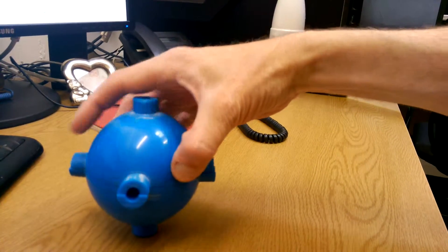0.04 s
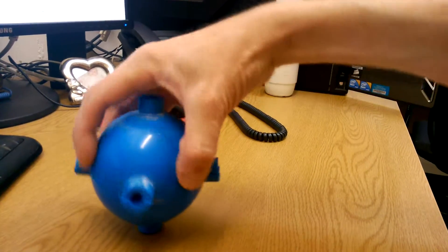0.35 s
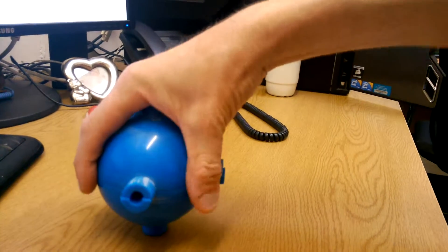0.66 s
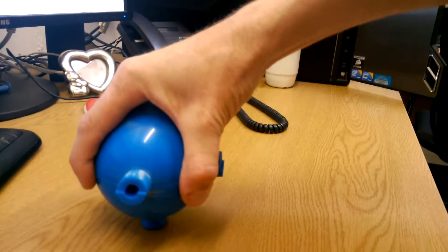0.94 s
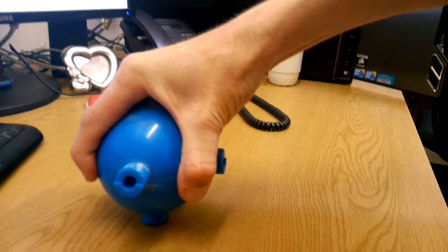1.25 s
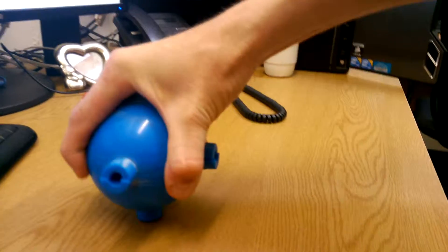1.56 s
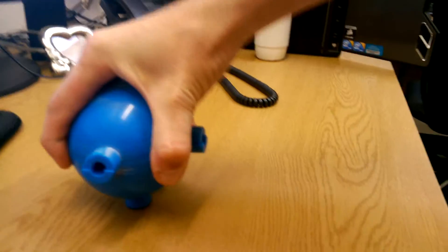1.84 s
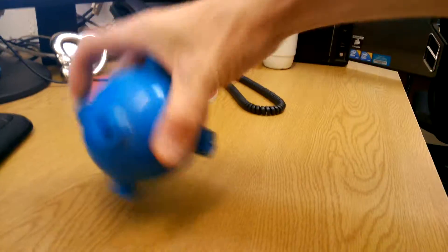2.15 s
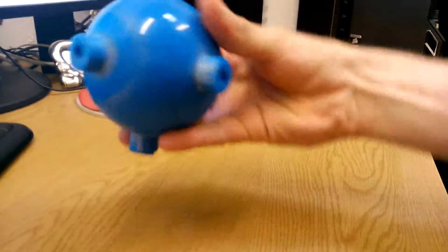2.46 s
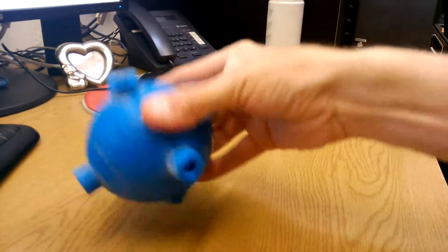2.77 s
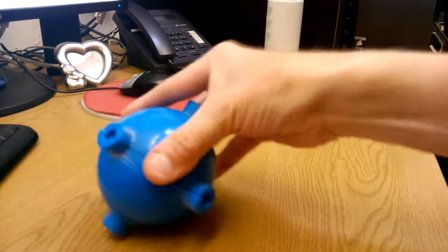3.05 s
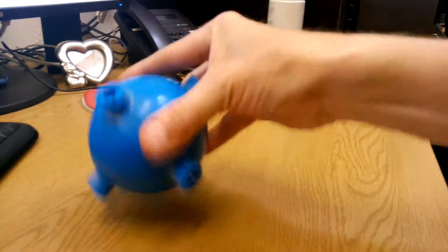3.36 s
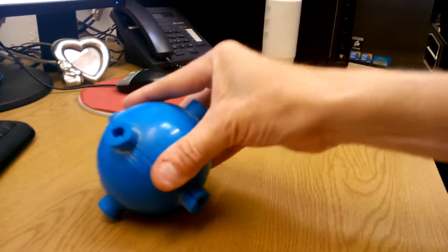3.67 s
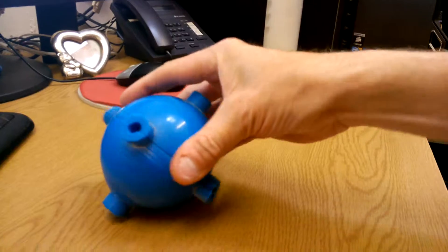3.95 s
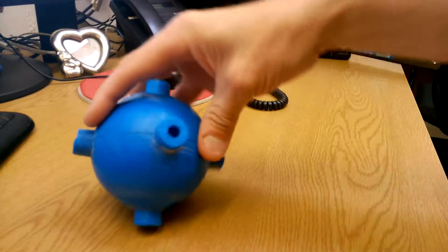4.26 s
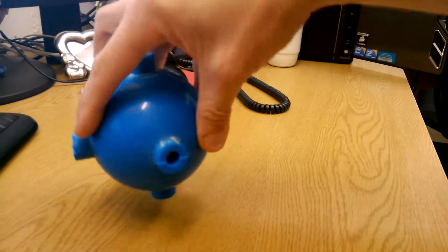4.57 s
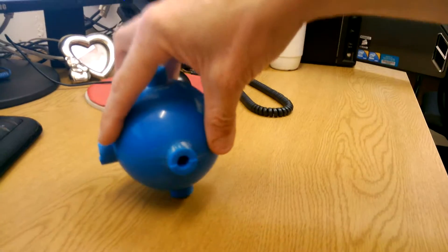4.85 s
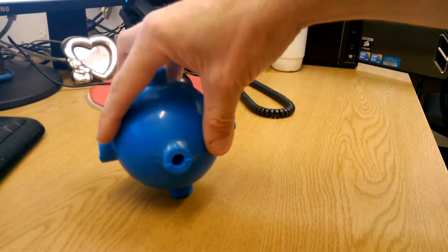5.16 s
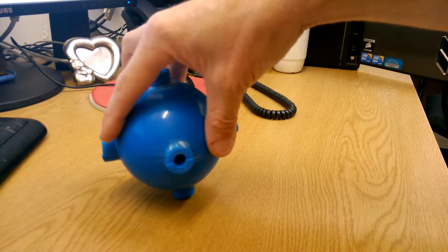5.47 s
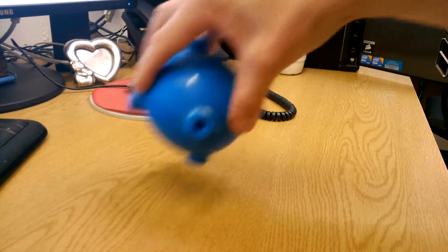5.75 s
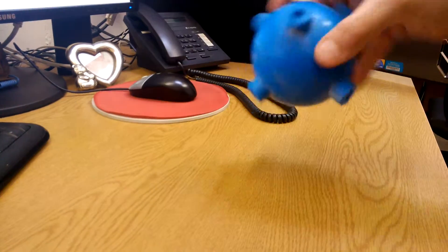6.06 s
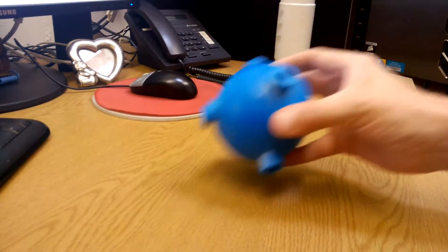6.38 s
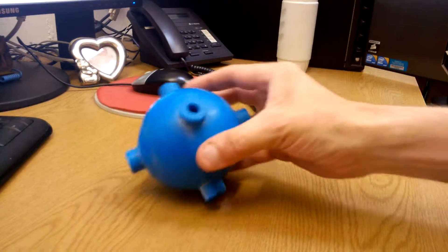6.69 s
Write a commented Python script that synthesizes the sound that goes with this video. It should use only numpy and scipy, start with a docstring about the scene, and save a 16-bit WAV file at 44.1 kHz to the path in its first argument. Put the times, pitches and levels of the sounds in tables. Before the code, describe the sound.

A hollow plastic ball with stubby pegs ticks and taps lightly on a wooden office desk while fingers rub its shell. It then knocks down six times in quick succession, growing louder, each hit booming in the desk and ringing briefly, the hardest overloading the close microphone. Soft settling taps follow, then a single knock and, near the end, two more with small skids. Ventilation hums low throughout.

```python
"""A hollow plastic ball with stubby pegs is turned by hand on an office desk, then bounced harder
and harder. Each knock booms in the desk and rings briefly in the shell; the loud ones overload
the close microphone, whose gain ducks and creeps back. In between, pegs tick and skid on the wood
and fingers slip on the plastic, over a low ventilation hum."""
import sys
import numpy as np
from scipy import signal
from scipy.fft import rfft, irfft
from scipy.io import wavfile
from scipy.ndimage import uniform_filter1d

SR = 44100
rng = np.random.default_rng(int(sys.argv[2]) if len(sys.argv) > 2 else 0)


def materialize(psi):
    """Save the field psi as 16-bit PCM at rate SR to the path in sys.argv[1].

    A 1-D psi becomes a single channel; in a 2-D psi each row is a channel.
    """
    bounded = np.clip(np.atleast_2d(psi).T, -1, 1)
    quanta = np.round(bounded * 32767).astype(np.int16)
    wavfile.write(sys.argv[1], SR, quanta)


N = 296352
TIME_S = np.arange(N) / SR
RING_S = np.arange(SR) / SR   # time since a contact

# ventilation rumble: freq_hz, relative_db
VENT_SPECTRUM = [(20, 6.5), (55, -8), (80, -2.5), (100, -0.5), (140, -7), (190, -0.5), (255, -4.5),
                 (320, -8), (500, -10), (800, -16.5), (1500, -25.5), (2400, -29.5), (4000, -45)]
# fan tones: pitch_hz, rms_db
FAN_TONES = [(100, -47), (183, -47.5), (259, -51.5)]
# steady hiss: freq_hz, relative_db
HISS_SPECTRUM = [(20, 31), (50, 23.5), (150, -4), (1000, 13), (2300, 5), (3300, 2.5), (4600, 4),
                 (5200, -0.5), (5550, 8.5), (6000, 1.5), (7000, -1.5), (8500, -0.5), (9700, 7), (11000, -4),
                 (13000, -4.5), (16000, -12)]
# office reverberation: freq_hz, t60_s
OFFICE_DECAY = [(100, 0.54), (250, 0.54), (800, 0.52), (2000, 0.5), (5000, 0.39), (12000, 0.32)]

# short finger slips: centre_s, half_length_s, level_db
FINGER_SLIPS = [(1.483, 0.038, -43), (1.591, 0.016, -37), (1.614, .009, -46), (5.485, 0.02, -46.5)]
# finger slip, also the echo of a peg tick: freq_hz, relative_db
SLIP_SPECTRUM = [(2000, -23), (4000, -9.5), (7000, -11), (8500, 0), (9900, 9), (11000, -7), (13000, -11),
                 (16000, -21)]
# finger slides, the rows at 3.92 s and 4.52 s faint breaths: centre_s, half_length_s, level_db, squeak_hz (a
# thin whistle for a breath), squeak_relative_db
SLIDES_AND_BREATHS = [(0.061, 0.026, -58, 7280, 4), (0.17, 0.088, -54.5, 7280, -10), (0.9, 1, -58.5, 7500, -22),
                      (1.65, 0.062, -72.5, 6730, 20), (1.904, 0.28, -49, 6410, -13),
                      (3.923, 0.092, -64.5, 5500, -1), (4.518, 0.17, -60, 4700, -9)]
# hiss of the finger slides and breaths: freq_hz, relative_db
SWELL_SPECTRUM = [(2500, -6), (3600, -11), (4300, -0.5), (5400, -1.5), (6200, -8.5), (8500, -6.5),
                  (9800, 1.5), (11000, -9.5), (13000, -20), (16000, -24)]

# a peg skids over the wood: centre_s, half_length_s, level_db
PEG_SKIDS = [(5.95, 0.015, -48), (6.031, 0.021, -58), (6.092, 0.016, -56.5)]
# resonances of the skidding peg: freq_hz, width_hz, level_db
PEG_SKID_MODES = [(263, 19, 27), (630, 130, -18), (3330, 38, -2), (4080, 590, -16), (6100, 150, -3),
                  (6660, 330, 0.5), (8400, 460, 2.5), (9660, 190, -3)]
# pegs tick on the wood: start_s, level_db
PEG_TICKS = [(0.3494, -25.5), (0.4013, -18), (0.5, -17), (0.5781, -31), (0.7721, -22), (0.7746, -17.5),
             (1.269, -18), (1.347, -32), (1.587, -36), (6.553, -37.5)]
# ring of a tick: freq_hz, level_db, t60_s
PEG_TICK_MODES = [(665, -14.5, 0.032), (1310, -15, 0.0066), (2800, -10.5, 0.0042), (5430, -5, 0.0019),
                  (7400, -10, 0.003), (8600, -7, 0.0059), (9600, -4, 0.0084), (12000, -7, 0.0017)]

# desk top: freq_hz, level_db, t60_s
DESK_TOP_MODES = [(97, -25, 0.28), (114.7, -28.5, 0.64), (141.5, -13, .24), (164.8, -30, 0.74),
                  (182.7, -21, 0.24), (208.7, -8.5, 0.18), (217, -16, 0.54), (250, -21.5, 0.15),
                  (285.5, -18.5, 0.33)]
# hollow shell: freq_hz, level_db, t60_s
SHELL_MODES = [(298.2, -15, 0.13), (333, -3.5, 0.053), (349.7, -8, 0.1), (393, -30, 0.16),
               (430, -22.5, 0.16), (497, -33, 0.51), (525.2, -21.5, 0.22), (574, -16.5, 0.13),
               (590, -41, 0.079), (616.5, -11, 0.052), (729, -32, 0.16), (734.5, -1, 0.023),
               (785.3, -15.5, 0.1), (898, -24.5, 0.13), (1004, -18.5, 0.064), (1135, -30, 0.15),
               (1237, -38, 0.27), (1505, -37, 0.097), (1647, -26.5, 0.071), (2150, -32, 0.021),
               (2380, -30, 0.047), (3930, -52, 0.59)]
# the spot under a peg gives way and springs back: freq_hz, level_db, t60_s
PEG_SEAT_MODES = [(352.5, -10, 0.027), (590, 0, 0.016), (1360, -20.5, 0.04), (2510, -11, 0.017)]
# crowded, quickly damped modes of a knock: freq_hz, relative_db
CLACK_SPECTRUM = [(30, 17.5), (100, -32), (250, -11), (450, 10), (750, 4.5), (900, -21.5), (1800, 0.5),
                  (3000, -13), (6000, -32), (16000, -48)]
# room echo of a knock: freq_hz, relative_db
KNOCK_ECHO_SPECTRUM = [(60, -30), (130, -5.5), (250, 10), (550, 3.5), (1000, -3.5), (2000, -14),
                       (4000, -18.5), (8000, -1.5), (16000, -27)]
# crack of a hard contact: freq_hz, relative_db
CRACK_SPECTRUM = [(300, 27), (1200, 11), (2500, 1.5), (4200, 11), (6000, 3), (7800, 3.5), (9700, 12),
                  (11500, 1), (16000, -10)]
# room echo of the crack: freq_hz, relative_db
CRACK_ECHO_SPECTRUM = [(300, 3), (1200, 11.5), (2300, 2), (3100, -0.5), (4200, -2.5), (6000, -6.5),
                       (7800, -11), (9700, 1), (11500, -14), (16000, -32)]
# the held ball rocks and settles on the desk: start_s, strength_db, bright_hz
BALL_NUDGES = [(0.2527, -26, 990), (0.3069, -24, 990), (0.351, -23.5, 920), (0.4013, -18, 980),
               (0.5015, -19, 940), (0.7753, -17.5, 1250), (1.368, -26, 2800), (1.381, -25, 420),
               (3.336, -18, 402), (3.398, -12.5, 720), (3.501, -17.5, 560), (3.524, -16.5, 298),
               (3.626, -19, 300), (3.66, -16, 466), (4.896, -26.5, 395), (6.547, -21, 616),
               (6.5552, -16.5, 735), (6.578, -12.5, 294)]
# bounces: start_s, strength_db, hardness_octaves, second_peg_delay_s, second_peg_relative_db
BALL_BOUNCES = [(2.019, 4, -0.17, 0.013, -16.5), (2.2458, 10, 0.41, 0.0085, -9),
                (2.4004, 6, 0.19, 0.021, -11.5), (2.589, 16, 0.064, 0.016, -11),
                (2.7991, 19.5, 0.23, 0.0061, -27), (3.0075, 20, 0.4, 0.0065, -22.5),
                (4.214, 5.5, -0.21, 0.006, -29), (5.9338, -1.5, 0.14, 0.019, -14.5),
                (6.1068, 2, 0.33, 0.016, -14)]


def from_db(db):
    """Decibels to gain."""
    return 10 ** (np.asarray(db) / 20)


def at_hz(points, hz):
    """Read a table on a log-frequency axis."""
    freqs, values = np.transpose(points)
    return np.interp(np.log(np.maximum(hz, 1)), np.log(freqs), values)


def noise(spectrum, size):
    """Coloured noise, rms 1."""
    gain = from_db(at_hz(spectrum, np.fft.rfftfreq(size, 1 / SR)))
    x = irfft(rfft(rng.standard_normal(size)) * gain, size)
    return x / np.std(x)


def decay(t60_s):
    """Envelope that loses 60 dB in t60_s."""
    return np.exp(-np.log(1000) * RING_S / t60_s)


def swells(events):
    """Sum of Gaussian envelopes."""
    return sum(from_db(db) * np.exp(-((TIME_S - centre_s) / half_s) ** 2)
               for centre_s, half_s, db in events)


def add(track, start_s, sound):
    """Mix a sound into the track."""
    start = round(start_s * SR)
    track[start:start + len(sound)] += sound[:N - start]


def resonance(x, hz, width_hz):
    """One resonance excited by x, rms 1."""
    y = signal.lfilter(*signal.iirpeak(hz, hz / width_hz, fs=SR), x)
    return y / np.std(y)


def lowpass(x, top_hz, order):
    """Butterworth low-pass, corner capped at SR / 3."""
    return signal.sosfilt(signal.butter(order, min(top_hz, SR / 3), fs=SR, output="sos"), x)


def power(x, window_s=0.0035):
    """Running mean square."""
    return np.maximum(uniform_filter1d(x ** 2, round(window_s * SR)), 1e-12)


def struck(modes, alternate, spread_db):
    """Damped modes, in step or alternating in sign; their levels vary with the spot struck."""
    spot_db = rng.normal(0, 1, len(modes)) * spread_db
    sign = -1 if alternate else 1
    return sum(sign ** k * from_db(db + spot_db[k]) * np.cos(2 * np.pi * hz * RING_S) * decay(t60_s)
               for k, (hz, db, t60_s) in enumerate(modes))


def ventilation():
    """Steady air rumble, fan tones and hiss."""
    rumble = from_db(-37.5) * noise(VENT_SPECTRUM, N)
    hum = sum(from_db(db) * np.sqrt(2) * np.sin(2 * np.pi * (hz * TIME_S + rng.random()))
              for hz, db in FAN_TONES)
    hiss = from_db(-54) * noise(HISS_SPECTRUM, N)
    return rumble + hum + hiss


def office_tail(spectrum, build_s):
    """Diffuse reflections build up, then die octave by octave, treble first."""
    bins = rfft(noise(spectrum, SR))
    hz = np.arange(SR // 2 + 1)
    edges_hz = [0, 180, 360, 720, 1400, 2800, 5600, 11000, SR]
    tail = np.zeros(SR)
    for low_hz, high_hz in zip(edges_hz, edges_hz[1:]):
        band = irfft(bins * (hz >= low_hz) * (hz < high_hz), SR)
        tail += band * decay(at_hz(OFFICE_DECAY, (low_hz + high_hz) / 2))
    return tail * (1 - np.exp(-RING_S / build_s))


def fingers_and_breaths():
    """Skin on plastic: short, bright slips and longer slides with a faint stick-slip squeak; two faint breaths
    with a thin whistle."""
    out = noise(SLIP_SPECTRUM, N) * swells(FINGER_SLIPS)
    rub = noise(SWELL_SPECTRUM, N)
    for centre_s, half_s, db, squeak_hz, squeak_db in SLIDES_AND_BREATHS:
        squeak = resonance(rng.standard_normal(N), squeak_hz, width_hz=68)
        stroke = np.exp(-((TIME_S - centre_s) / half_s) ** 4)
        out += from_db(db) * stroke * (rub + from_db(squeak_db) * squeak)
    return out


def peg_skids(slips_per_s=2500):
    """Dense little slips of a dragged peg keep its resonances buzzing."""
    slips = rng.standard_normal(N) * (rng.random(N) < slips_per_s / SR) + 1e-18
    buzz = sum(from_db(db) * resonance(slips, hz, width_hz) for hz, width_hz, db in PEG_SKID_MODES)
    return swells(PEG_SKIDS) * buzz


def peg_ticks(trim_db=-1.5):
    """Pegs rock on the wood: tiny bright rings with a faint echo."""
    out = np.zeros(N)
    for start_s, db in PEG_TICKS:
        echo = from_db(-32) * office_tail(SLIP_SPECTRUM, build_s=0.0017)
        ring = struck(PEG_TICK_MODES, alternate=True, spread_db=3.0)
        add(out, start_s, from_db(db + trim_db) * (ring + echo))
    return out


def peg_crack(bright_hz, onset_hz=944):
    """Noise burst and echo of a hard peg; grows as the contact brightens."""
    gain = from_db(3) / (1 + (onset_hz / bright_hz) ** 2.8)
    burst = from_db(-11) * noise(CRACK_SPECTRUM, SR) * decay(t60_s=0.034)
    echo = from_db(-32.5) * office_tail(CRACK_ECHO_SPECTRUM, build_s=0.0017)
    return gain * lowpass(burst + echo, 5.7 * bright_hz, order=1)


def knock(bright_hz, shell_db=0):
    """Desk and shell ring together; a long, soft contact booms more, a brief, hard one cracks."""
    boom_db = -0.4 - 3.0 * np.log2(bright_hz / 865)
    desk = from_db(boom_db) * struck(DESK_TOP_MODES, alternate=False, spread_db=0.1)
    shell = from_db(shell_db) * struck(SHELL_MODES, alternate=True, spread_db=3.0)
    tock = struck(PEG_SEAT_MODES, alternate=False, spread_db=1.0)
    clack = from_db(-6.5) * noise(CLACK_SPECTRUM, SR) * decay(t60_s=0.045)
    echo = from_db(-22) * office_tail(KNOCK_ECHO_SPECTRUM, build_s=0.004)
    blow = desk + shell + tock + clack + echo
    blow *= from_db(0.5) / np.sqrt(power(blow).max())   # same peak power, however the modes share it
    return lowpass(blow, bright_hz, order=3) + peg_crack(bright_hz)


def ball_nudges(grip_db=-5.5):
    """Light knocks of the held ball; the grip muffles the shell."""
    out = np.zeros(N)
    for start_s, db, bright_hz in BALL_NUDGES:
        add(out, start_s, from_db(db) * knock(bright_hz, shell_db=grip_db))
    return out


def ball_bounces(base_hz=686, octaves_per_db=0.0968, second_peg_ratio=1.57):
    """The ball lands on one peg, then another; a harder bounce is a shorter, brighter contact."""
    out = np.zeros(N)
    for start_s, db, hardness_octaves, delay_s, second_db in BALL_BOUNCES:
        bright_hz = base_hz * 2 ** (octaves_per_db * db + hardness_octaves)
        add(out, start_s, from_db(db) * knock(bright_hz))
        add(out, start_s + delay_s, from_db(db + second_db) * knock(second_peg_ratio * bright_hz))
    return out


def scene():
    """Mono mix, close above the desk."""
    ball = ball_bounces() + ball_nudges() + peg_ticks() + peg_skids()
    return (ball + fingers_and_breaths() + ventilation())[None]


def gain_control(x, threshold_db=-2.3, recover_db_per_s=26.5):
    """A loud knock ducks the gain at once; it creeps back at a steady rate."""
    over_db = np.maximum(10 * np.log10(power(x)) - threshold_db, 0)
    recovery_db = recover_db_per_s * TIME_S
    duck_db = np.maximum.accumulate(over_db + recovery_db, axis=-1) - recovery_db
    return x * from_db(-duck_db)


def record(dry, low_cut_hz=60, clip_level=0.71, top_cut_hz=16200):
    """Microphone chain: bass cut, gain ducking, soft clipping, top cut."""
    lean = signal.sosfilt(signal.butter(1, low_cut_hz, "high", fs=SR, output="sos"), dry)
    ducked = gain_control(lean)
    clipped = ducked / (1 + (ducked / clip_level) ** 12) ** (1 / 12)
    return signal.sosfilt(signal.ellip(10, 0.1, 80, top_cut_hz, fs=SR, output="sos"), clipped)


dry = scene()
out = record(dry)
materialize(out)
```